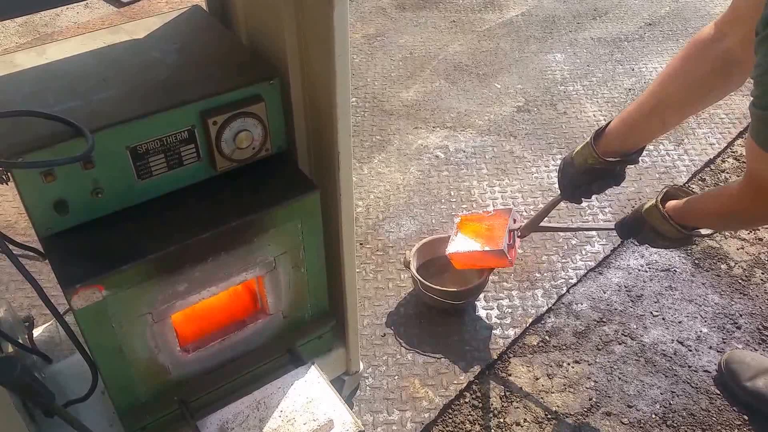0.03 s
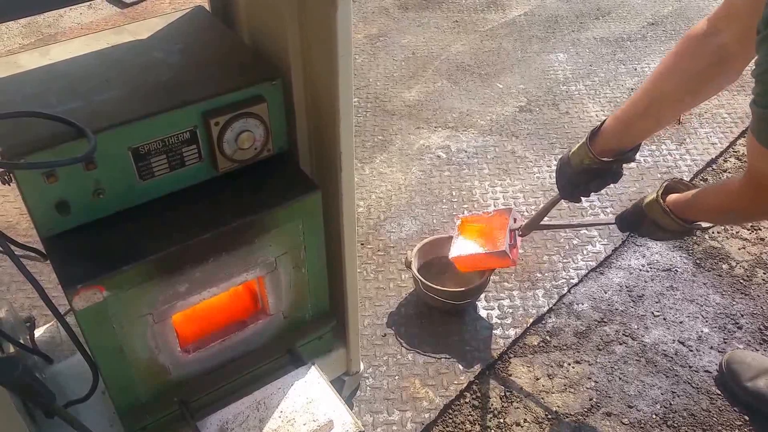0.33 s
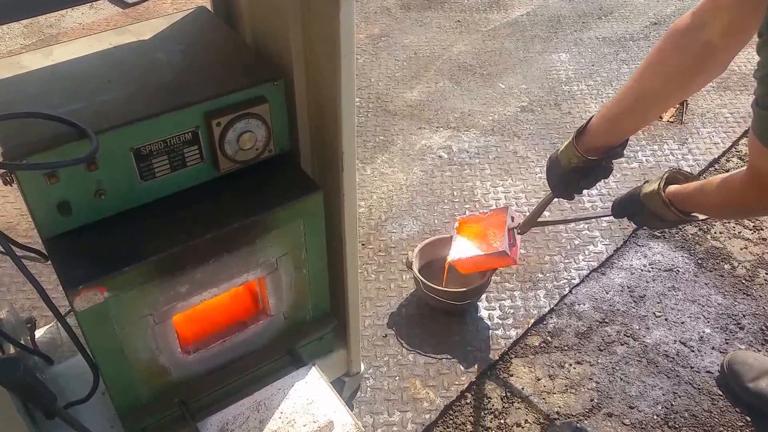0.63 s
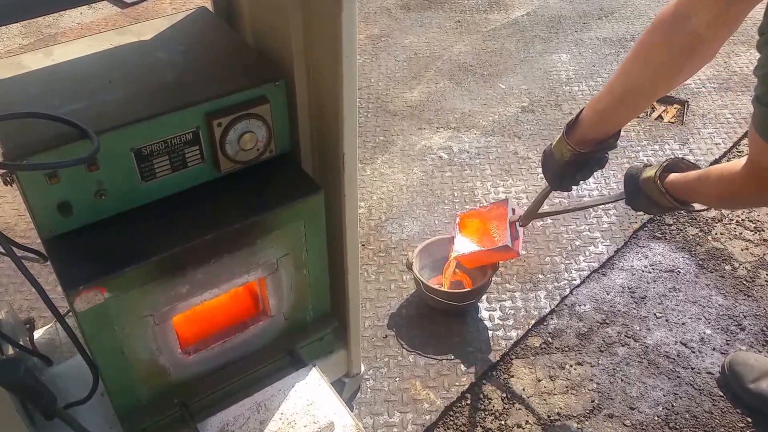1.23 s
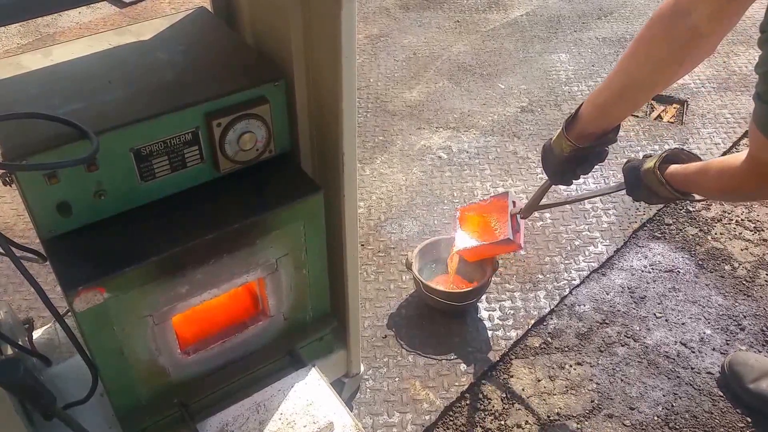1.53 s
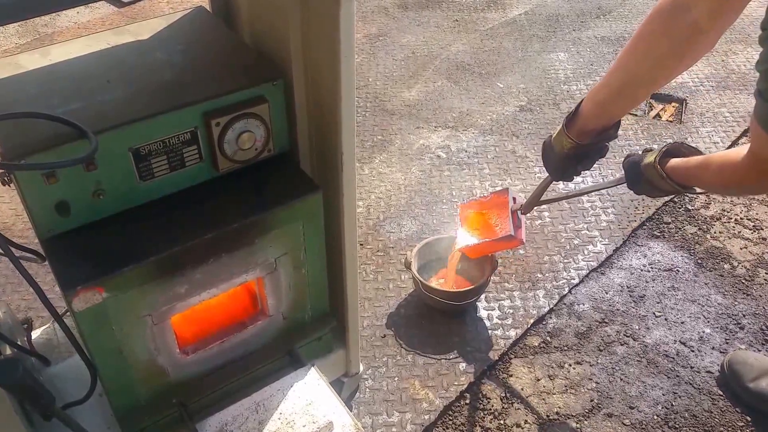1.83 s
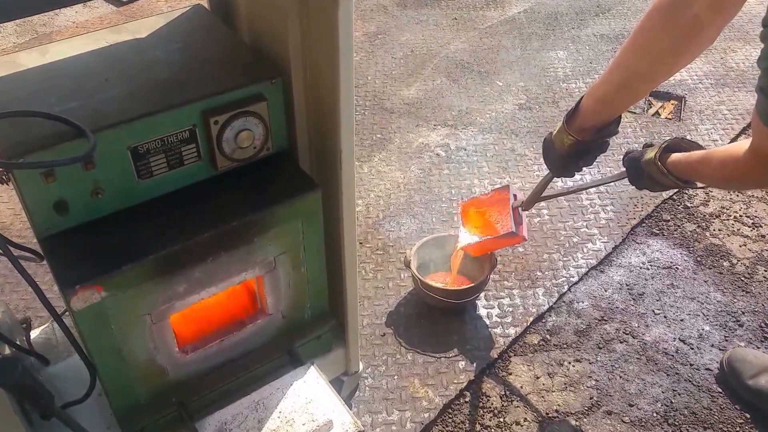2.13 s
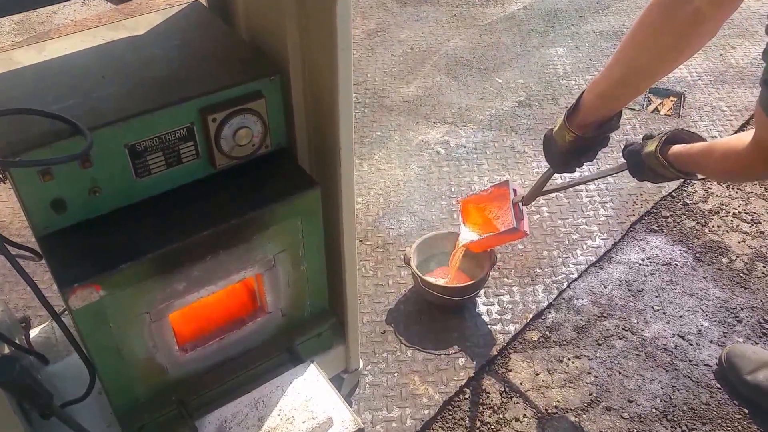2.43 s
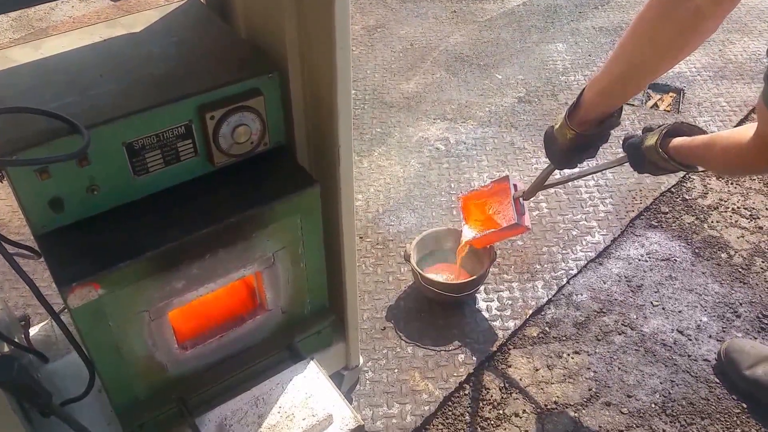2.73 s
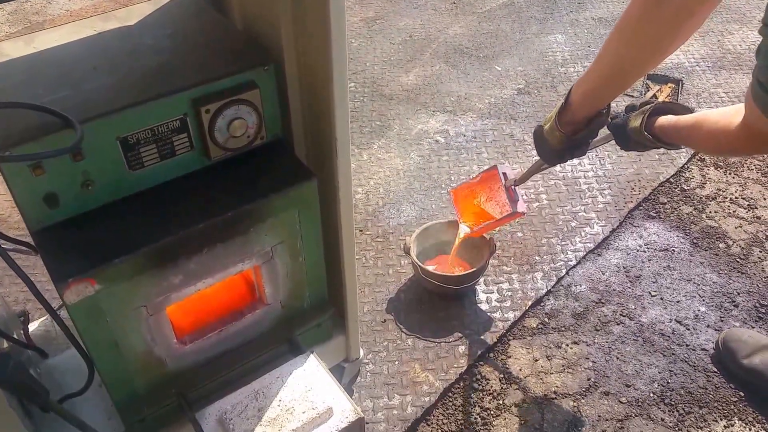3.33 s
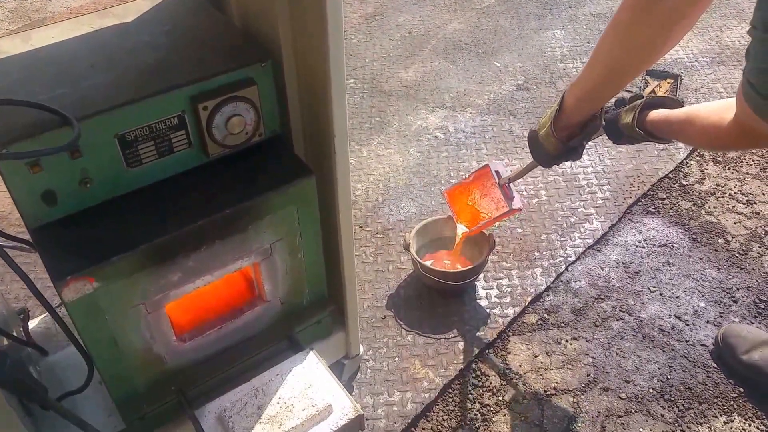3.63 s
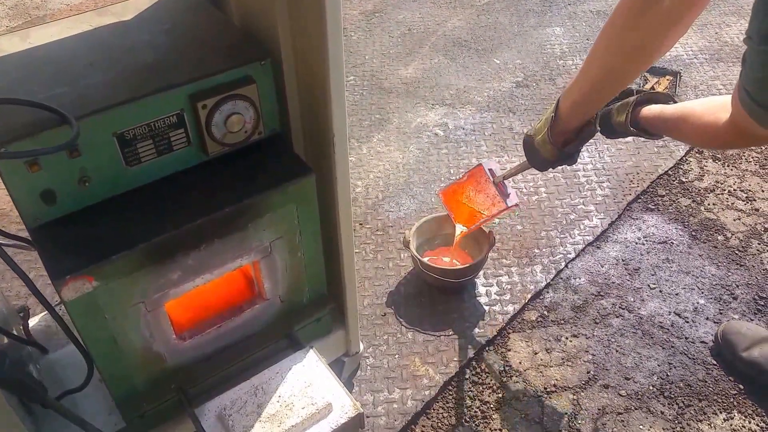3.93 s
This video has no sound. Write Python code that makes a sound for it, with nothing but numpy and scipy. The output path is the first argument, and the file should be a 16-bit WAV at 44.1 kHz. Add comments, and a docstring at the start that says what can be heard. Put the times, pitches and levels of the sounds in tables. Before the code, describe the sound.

Gusts buffet the microphone in a yard with a steady distant hum. On the left, rubbing metal squeals faintly, tongs knock a few times against a crucible, and poured molten metal crackles and spits quietly under the wind.

```python
"""Molten metal poured from a crucible into an iron pot, heard in a windy yard, left of the microphone.
The melt crackles faintly and spits; tongs and crucible knock a few times and ring the damped iron.
Right at the microphone, gusts rumble and eddies thump on its two ports, louder than the pour.
Farther off lie a steady outdoor hum, a very faint whine and, early on, a thin two-pitched squeal
of rubbing metal. One soft rush of noise passes near the end."""
import sys
import numpy as np
from scipy import signal
from scipy.fft import rfft, irfft
from scipy.io import wavfile
from scipy.ndimage import uniform_filter1d

SR = 44100
rng = np.random.default_rng(int(sys.argv[2]) if len(sys.argv) > 2 else 0)


def generate_wav(signal):
    """Clip the signal to [-1, 1] and save it as 16-bit WAV at the path in sys.argv[1]."""
    frames = np.transpose(np.atleast_2d(signal))
    scaled = np.clip(frames, -1, 1) * 32767
    pcm = np.round(scaled).astype(np.int16)
    wavfile.write(sys.argv[1], SR, pcm)


N = 176400
TIME = np.arange(N) / SR
BIN_HZ = np.arange(N // 2 + 1) * SR / N

# Table levels are relative: each source adds its own gain.
# wind pressure on each microphone port: (time [s], level [dB])
GUSTS_LEFT = [(0.0, -25.5), (0.23, -26), (0.31, -36.5), (0.44, -27), (0.51, -43.5), (0.63, -25),
              (0.78, -23.5), (0.85, -24.5), (1.11, -19), (1.16, -26), (1.29, -25), (1.38, -29), (1.47, -25),
              (1.52, -36), (1.57, -27.5), (1.74, -31.5), (1.79, -31), (1.9, -31), (1.95, -22), (2.01, -36),
              (2.12, -18), (2.2, -31), (2.25, -34.5), (2.33, -27), (2.39, -33), (2.46, -15.5),
              (2.52, -22.5), (2.59, -22), (2.73, -28), (3.03, -18.5), (3.11, -30.5), (3.24, -18.5),
              (3.34, -24.5), (3.46, -21), (3.57, -25.5), (3.61, -31), (3.75, -23), (3.84, -40.5),
              (3.93, -20.5), (4.0, -34.5)]
GUSTS_RIGHT = [(0.0, -42.5), (0.81, -40.5), (1.07, -46), (1.2, -37), (1.32, -50), (1.42, -23), (1.74, -34),
               (1.9, -16.5), (1.95, -34), (2.05, -26.5), (2.1, -48), (2.2, -22.5), (2.26, -41), (2.37, -46),
               (2.47, -31), (2.6, -47), (2.66, -32), (2.74, -47), (2.8, -39.5), (3.44, -42.5),
               (3.52, -25.5), (3.6, -38), (3.77, -34.5), (4.0, -46)]
# turbulence at the ports: (frequency [Hz], level [dB])
WIND_SPECTRUM = [(25, -17.5), (50, -1.5), (85, -1), (125, 1), (180, -7), (300, -14.5), (550, -26.5),
                 (1000, -39), (2000, -60)]
# the distant hum on each side: (frequency [Hz], level [dB])
HUM_SPECTRUM_LEFT = [(30, 6.5), (100, 6), (300, -8.5), (560, -2.5), (760, 4), (1100, -8), (1700, -5.5),
                     (2400, -8.5), (3200, -17.5), (4200, -31), (5500, -24), (7000, -36.5), (10000, -35),
                     (15500, -39)]
HUM_SPECTRUM_RIGHT = [(30, -32.5), (100, 13), (300, -7.5), (560, -2), (760, 2), (1100, -6.5), (1700, -8),
                      (2400, -14), (3200, -26), (4200, -29), (5500, -34.5), (7000, -45.5), (10000, -42),
                      (15500, -36)]
# how alike the hum is at the two ports: (frequency [Hz], correlation [0-1])
HUM_LIKENESS = [(100, 1), (700, 0), (2000, 0), (5000, 0.15), (15000, 0.13)]
# single eddies striking each port: (time [s], peak level [dB], low-pass cutoff [Hz])
EDDIES_LEFT = [(.065,-21,398),(.215,-32,382),(.609,-20,649),(.826,-16.5,595),(.836,-14,280),(.861,-11.5,670),(.915,-21,218.8),(.923,-22,630),(.949,-18,435),(1.017,-13.5,610),(1.028,-14.5,567),(1.053,-15,382),(1.103,-16.5,334.5),(1.204,-16,336),(1.274,-12,280),(1.317,-18,451),(1.784,-21,519),(2.111,-22,340),(2.334,-18,230),(2.463,-14,316),(2.596,-14,276),(2.765,-18.5,413),(2.811,-16.5,556),(2.833,-16,370),(2.845,-20,230),(2.92,-25,503),(2.953,-17.5,414),(3.015,-17.5,293),(3.038,-18,452),(3.058,-17,700),(3.2,-31,450),(3.248,-16,404),(3.437,-22.5,330),(3.917,-23,260)]
EDDIES_RIGHT = [(1.425,-20,302),(1.486,-21,624),(1.514,-28,414),(1.622,-22.5,360),(1.657,-23,352),(1.811,-24.5,285),(1.853,-23,524),(1.881,-16.5,600),(1.887,-12.5,650),(1.897,-14,246),(2.197,-18.5,257),(2.653,-23,200)]
# the two notes of rubbing metal: (time [s], pitch [Hz], level [dB])
SQUEAL_HIGH = [(.14, 2500, -71), (.168, 2505, -51.5), (.29, 2500, -52.5), (.36, 2480, -61), (.5, 2450, -64),
               (.56, 2472, -52), (.65, 2480, -66), (.87, 2440, -60), (1.0, 2430, -64)]
SQUEAL_LOW = [(.3, 1975, -71), (.38, 1972, -44), (.43, 1970, -57), (.48, 1960, -55.5), (.66, 1972, -60),
              (.72, 1960, -43), (.755, 1974, -43.5), (.795, 1970, -61), (.835, 1984, -49.5),
              (.98, 1951, -57), (1.12, 1972, -52.5), (1.22, 1970, -55), (1.33, 1970, -57),
              (1.42, 1956, -63)]
# the melt crackling in the pot: (time [s], level [dB])
CRACKLE_LEVEL = [(0, -85), (.73, -75), (.76, -47.5), (.82, -67), (.9, -62), (.94, -54), (1.0, -64),
                 (1.09, -57), (1.37, -65.5), (1.45, -49), (1.51, -55), (1.56, -50.5), (1.66, -61),
                 (1.72, -53), (1.82, -60.5), (1.95, -59.5), (2.15, -63), (2.33, -60.5), (2.42, -63.5),
                 (2.48, -51), (2.58, -64), (2.7, -56), (3.15, -62), (3.33, -64), (3.5, -60), (3.66, -60),
                 (3.78, -69), (4, -61.5)]
# tone of the crackle: (frequency [Hz], level [dB])
CRACKLE_SPECTRUM = [(1500, 6.5), (2500, 5), (3400, -0.5), (4200, -8.5), (5600, 3), (6800, -11.5),
                    (8000, -13), (9800, -4), (11000, -7.5), (13000, -15), (15500, -16)]
# bursting droplets: (time [s], level [dB], tilt [dB/octave], left over right [dB])
SPITS = [(0.7456, -31.5, -2, 9), (.932, -48, 0, 11), (.943, -46, 13, 9), (1.77, -55, 18, 9),
         (1.934, -48.5, 13, 5), (1.9739, -46, -8, 12), (2.078, -52, 10, 9), (2.27, -46, -8, 9),
         (2.3381, -40.5, -13, 8), (2.349, -42, -15, 11), (2.506, -50, -2, 9), (2.6555, -43, 7, 13),
         (2.683, -44, 6, 9), (2.701, -49, 9, 9), (2.798, -45, 0, 9), (2.8534, -46.5, 13, 11),
         (2.872, -46, -2, 7), (2.939, -46, 3, 9), (3.0644, -47, -7, 12), (3.255, -49.5, 13, 11),
         (3.3278, -43, -3, 13), (3.585, -51, 8, 13), (3.632, -40, -12, 18), (3.8685, -34.5, -9, 14),
         (3.8953, -49, 13, 14)]
# resonances a spit rings: (frequency [Hz], level [dB], t60 [s])
SPIT_MODES = [(5270, -12, 0.0074), (5640, 2, 0.0074), (7070, -14.5, 0.0047), (9400, -10, .006),
              (10660, -9.5, 0.0044), (14800, -16, .004)]
# tongs and crucible knocking: (time [s], level [dB], low-mode gain [dB], left over right [dB])
KNOCKS = [(0.7466, -32.5, -5, 6), (1.1356, -42.5, 7, -1), (1.1479, -23, -1, 8.5), (1.1505, -34.5, -6, 11),
          (1.158, -37, -8, -1), (1.4249, -41.5, 2.5, 6), (1.5788, -19.5, 5, 6), (1.5802, -14.5, -28, 9),
          (1.6265, -41, 3, 8), (1.6865, -35, -13, 11.5), (1.718, -38, -6, 13), (1.734, -35.5, -4, 11)]
# resonances of the damped iron: (frequency [Hz], level [dB], t60 [s])
IRON_MODES = [(682, -6.5, 0.053), (1282, -0.5, 0.014), (1910, 0, 0.022), (2166, 4.5, 0.011),
              (2570, -7, 0.011), (2960, -27, 0.01), (3430, -11, 0.012), (5300, -9, 0.009),
              (5850, -10, 0.0071), (7100, -18, 0.0057), (9970, -8.5, 0.0045), (11000, -8.5, 0.0032),
              (14500, -19, 0.0043)]
# a knock's crack and its scatter off ground and walls: (frequency [Hz], level [dB])
KNOCK_NOISE_SPECTRUM = [(300, 3), (700, 7.5), (2000, 4.5), (3300, 3), (4300, -7), (5500, -4.5), (7500, -13),
                        (10000, -3.5), (15000, -20)]
# the soft rush in the background: (frequency [Hz], level [dB])
RUSH_SPECTRUM = [(400, 1.5), (900, 4), (1400, -6.5), (2100, 4), (2900, -14), (4500, -20.5), (9000, -38)]


def from_db(db):
    """Decibels to gain."""
    return 10 ** (np.asarray(db) / 20)


def unit_rms(x):
    """Scale to rms 1."""
    return x / np.sqrt(np.mean(x ** 2) + 1e-20)


def in_time(rows):
    """Each column of a curve at every sample."""
    times, *columns = np.transpose(rows)
    return [np.interp(TIME, times, column) for column in columns]


def in_frequency(rows):
    """A curve at every FFT bin, interpolated on a log-frequency axis."""
    hz, values = np.transpose(rows)
    return np.interp(np.log(BIN_HZ + 1e-9), np.log(hz), values)


def pan(db):
    """Left and right gains for a level difference."""
    return from_db(np.array([[.5], [-.5]]) * db)


def butter(order, hz, kind="low"):
    """Sections of a flat-passband filter."""
    return signal.butter(order, hz, kind, fs=SR, output="sos")


def drift(hz):
    """Random wander of spread 1, mostly slower than hz."""
    step, settle = 40, 2000
    pole = np.exp(-2 * np.pi * hz * step / SR)
    noise = rng.standard_normal(N // step + settle + 2)
    slow = signal.lfilter([1], [1, -2 * pole, pole * pole], noise)[settle:]
    return np.interp(np.arange(N) / step, np.arange(len(slow)), unit_rms(slow))


def colour(noise, spectrum):
    """Give a noise a spectrum, rolled off below hearing; rms 1."""
    roll_off = np.minimum(BIN_HZ / 20, 1) ** 2
    return unit_rms(irfft(rfft(noise) * from_db(in_frequency(spectrum)) * roll_off, N))


def dying(onset_s, decay_s):
    """A sudden onset and an exponential decay."""
    return (TIME >= onset_s) * np.exp(-np.minimum(abs(TIME - onset_s) / decay_s, 60))


def ring(drive, hz, t60):
    """One resonance: a unit click starts a decaying sine of height 1."""
    pole, angle = np.exp(-np.log(1000) / (t60 * SR)), 2 * np.pi * hz / SR
    return signal.lfilter([0, np.sin(angle)], [1, -2 * pole * np.cos(angle), pole * pole], drive + 1e-18)


def wind(gusts, gain_db, flutter_db=2.27, gust_brightening=0.13):
    """Turbulence on one port: an even rumble, and a lumpier upper part that grows faster in gusts."""
    gust_db, = in_time(gusts)
    air = colour(rng.standard_normal(N), WIND_SPECTRUM + [(8000, -98)])
    air /= np.sqrt(uniform_filter1d(air ** 2, size=2600) + .05)  # even out chance swells
    rumble = signal.sosfiltfilt(butter(2, hz=220), air)
    pressure = from_db(gain_db + gust_db + flutter_db * drift(hz=23))
    upper_db = gust_brightening * (gust_db - gust_db.mean()) + 6.1 * drift(hz=67) - 3.4
    return pressure * (rumble + (air - rumble) * from_db(upper_db))


def yard_hum(left_db=-42, right_db=-44):
    """Steady distant noise, alike at both ports in the bass and diffuse above."""
    alike = np.clip(in_frequency(HUM_LIKENESS), -.99, .99)
    mid, side = irfft(rfft(rng.standard_normal((2, N))) * np.sqrt([1 + alike, 1 - alike]), N)
    left = from_db(left_db) * colour(mid + side, HUM_SPECTRUM_LEFT)
    right = from_db(right_db) * colour(mid - side, HUM_SPECTRUM_RIGHT)
    return np.array([left, right])


def whine(hz=9087, gain_db=-87):
    """A very faint steady tone off to the left."""
    return from_db(gain_db) * pan(db=9.5) * np.sin(2 * np.pi * hz * TIME)


def eddies(rows, gain_db=0.5, bass_cut_hz=111, q=1.7, swirl_s=0.0046):
    """Each eddy is a pressure spike within a short swirl; the port's bass cut makes it swing back."""
    out = np.zeros(N)
    omega = 2 * np.pi * bass_cut_hz
    bass_cut = signal.bilinear([1, 0, 0], [1, omega / q, omega ** 2], SR)
    t = np.arange(-SR // 20, SR // 20) / SR
    for at_s, db, cutoff_hz in rows:
        swirl = 0.043 * rng.standard_normal(len(t)) * np.exp(-abs(t) / swirl_s)
        push = signal.sosfilt(butter(4, cutoff_hz), (t == 0) + swirl)
        thump = signal.lfilter(*bass_cut, push)
        start = int((at_s + t[0]) * SR)
        out[start:start + len(t)] += from_db(db + gain_db) * thump / abs(thump).max()
    return out


def squeal(note, gain_db=-2, waver_hz=7.1, flicker_db=4):
    """One wavering, flickering note of rubbing metal, in the background on the left."""
    hz, db = in_time(note)
    phase = 2 * np.pi * np.cumsum(hz + waver_hz * drift(hz=34)) / SR
    sounding = (TIME > note[0][0]) & (TIME < note[-1][0])
    level = from_db(gain_db + db + flicker_db * drift(hz=45))
    return pan(db=11) * sounding * level * np.sin(phase)


def crackle(gain_db=-1.5, spread_db=3, grain_s=0.0006, split_hz=8300):
    """Clumps of tiny crackles, lower and higher ones, as the melt runs into the pot."""
    level_db, = in_time(CRACKLE_LEVEL)
    grains_per_s = 600 * from_db(4.0 * drift(hz=30))
    grains = np.zeros((2, N))
    for band in ("low", "high"):
        onsets = rng.random(N) < grains_per_s / SR
        sizes = onsets * from_db(spread_db * np.minimum(rng.exponential(1, N), 5))
        power = signal.lfilter([1], [1, -np.exp(-1 / (grain_s * SR))], sizes ** 2 + 1e-18)
        bursts = np.sqrt(power) * rng.standard_normal((2, N))
        grains += signal.sosfilt(butter(2, split_hz, band), bursts)
    return from_db(gain_db + level_db) * pan(db=12.5) * colour(grains, CRACKLE_SPECTRUM)


def spits(gain_db=-7.5, pivot_hz=5630, fizz_s=0.0021):
    """A droplet bursts with a click and a moment of fizz, ringing a few high resonances."""
    out, t = np.zeros((2, N)), np.arange(SR // 20) / SR
    for at_s, db, tilt_db, pan_db in SPITS:
        burst = (t == 0) + 0.12 * np.exp(-t / fizz_s) * rng.standard_normal((2, len(t)))
        ringing = sum(from_db(mode_db + tilt_db * np.log2(hz / pivot_hz)) * ring(burst, hz, t60)
                      for hz, mode_db, t60 in SPIT_MODES)
        start = int(at_s * SR)
        out[:, start:start + len(t)] += from_db(gain_db + db) * pan(pan_db) * ringing
    return out


def knocks(iron_db=-4, crack_db=-8, scatter_db=-19.5, scatter_t60=0.21, low_modes_below_hz=3000):
    """Each contact of tongs and crucible cracks and rings the iron; ground and walls scatter it back."""
    high_drive, low_drive, crack_level, tail_power = np.zeros((4, 2, N))
    for at_s, db, low_db, pan_db in KNOCKS:
        gain = from_db(db) * pan(pan_db)
        contact = gain * (np.arange(N) == int(at_s * SR))
        high_drive += contact
        low_drive += contact * from_db(low_db)
        crack_level += gain * dying(at_s, decay_s=0.002)
        tail_power += (gain * dying(at_s, scatter_t60 / np.log(1000))) ** 2
    iron = np.zeros((2, N))
    for k, (hz, db, t60) in enumerate(IRON_MODES):
        drive = low_drive if hz < low_modes_below_hz else high_drive
        iron += (-1) ** k * from_db(db) * ring(drive, hz, t60)  # modes alternate in sign
    noise = colour(rng.standard_normal((2, N)), KNOCK_NOISE_SPECTRUM)
    scatter = signal.sosfilt(butter(1, hz=4470), noise * np.sqrt(tail_power))
    return from_db(iron_db) * iron + from_db(crack_db) * noise * crack_level + from_db(scatter_db) * scatter


def rush(peak_s=3.31, attack_s=0.028, decay_s=0.099, gain_db=-39.5):
    """A soft rush of noise swells and fades, a little left of centre."""
    swell = np.exp(np.minimum((TIME - peak_s) / attack_s, (peak_s - TIME) / decay_s))
    return from_db(gain_db) * swell * pan(db=4.5) * colour(rng.standard_normal((2, N)), RUSH_SPECTRUM)


def scene():
    """Wind on the microphone, thinner on the right port, over the pour and the yard behind it."""
    left = wind(GUSTS_LEFT, gain_db=-2.5) + eddies(EDDIES_LEFT)
    right = wind(GUSTS_RIGHT, gain_db=-3) + eddies(EDDIES_RIGHT)
    right = signal.sosfilt(butter(1, hz=83, kind="high"), right)
    background = yard_hum() + whine() + rush() + squeal(SQUEAL_HIGH) + squeal(SQUEAL_LOW)
    pour = knocks() + crackle() + spits()
    return np.array([left, right]) + background + pour


def record(dry):
    """The microphone signal is cut steeply at the top."""
    cutoff_hz = 16000
    return signal.sosfilt(signal.ellip(10, .1, 80, cutoff_hz, fs=SR, output="sos"), dry)


dry = scene()
out = record(dry)
generate_wav(out)
```